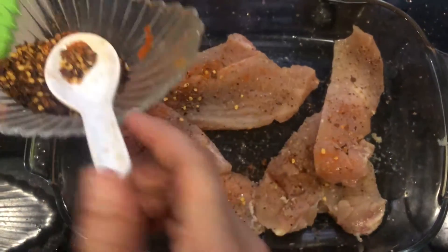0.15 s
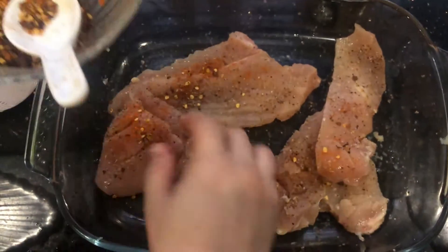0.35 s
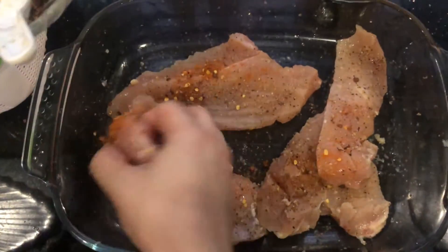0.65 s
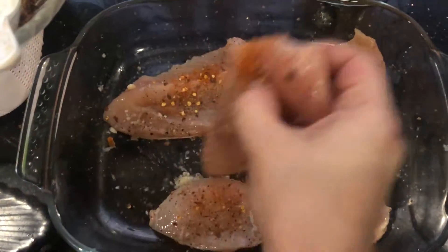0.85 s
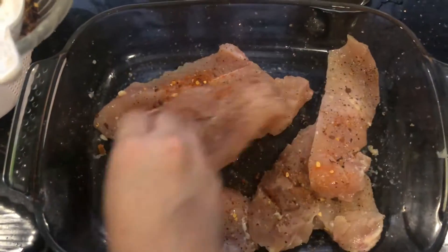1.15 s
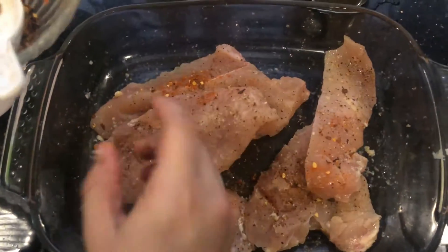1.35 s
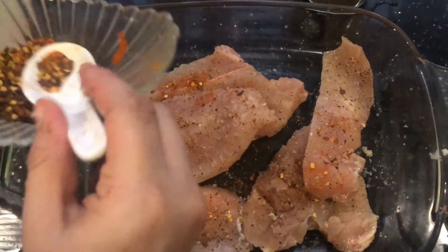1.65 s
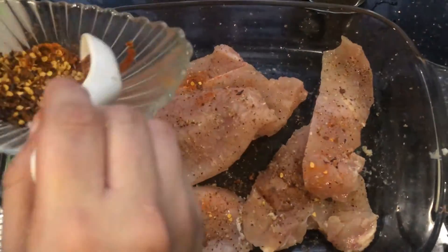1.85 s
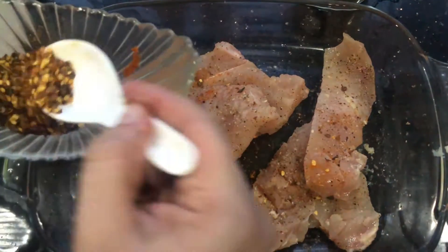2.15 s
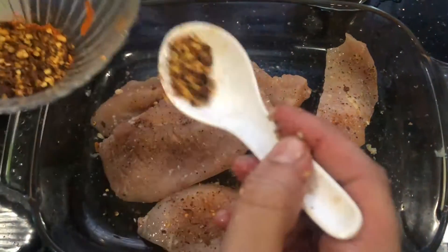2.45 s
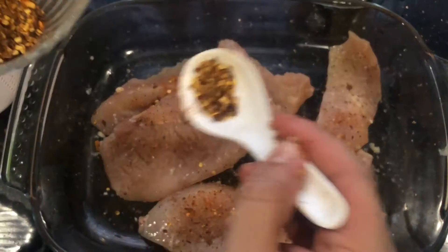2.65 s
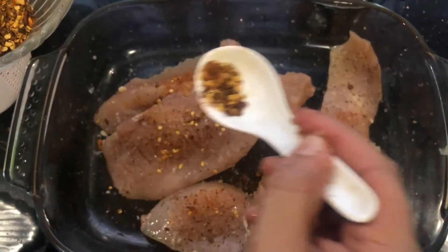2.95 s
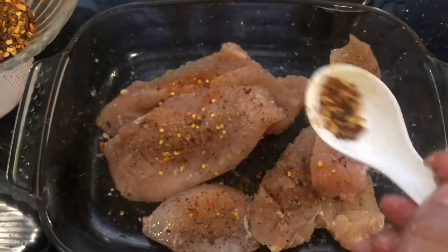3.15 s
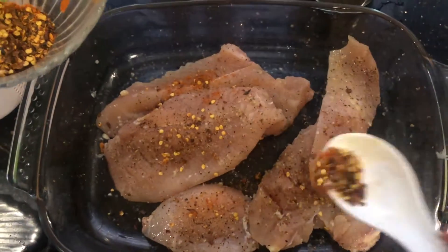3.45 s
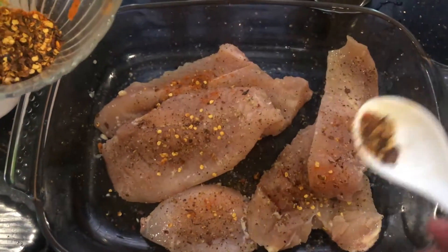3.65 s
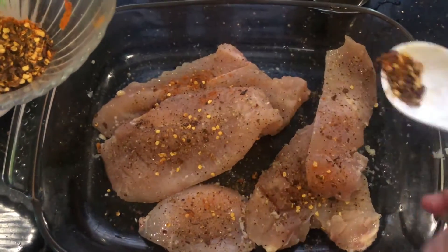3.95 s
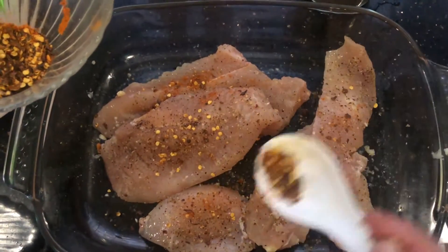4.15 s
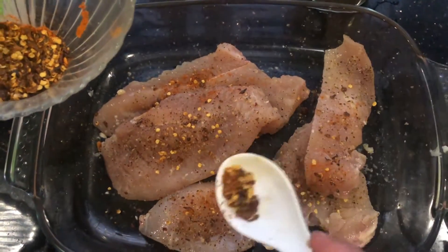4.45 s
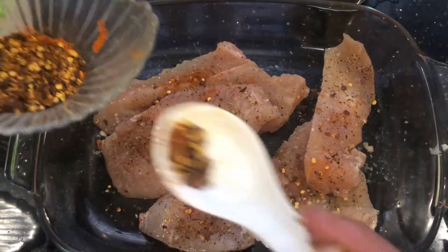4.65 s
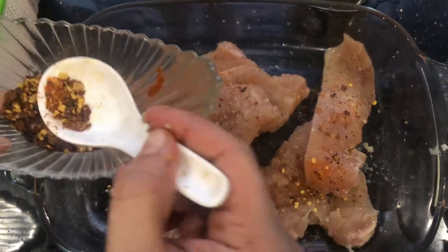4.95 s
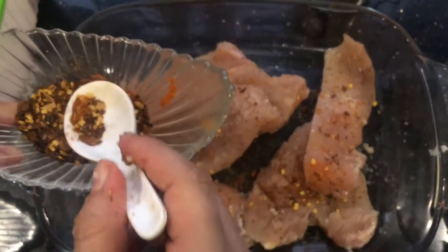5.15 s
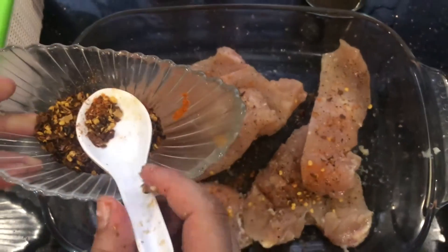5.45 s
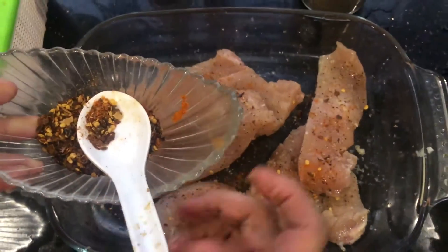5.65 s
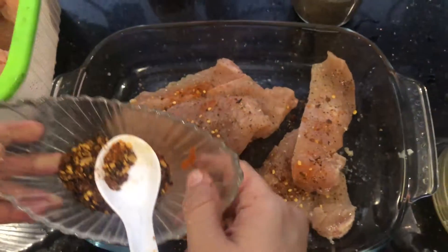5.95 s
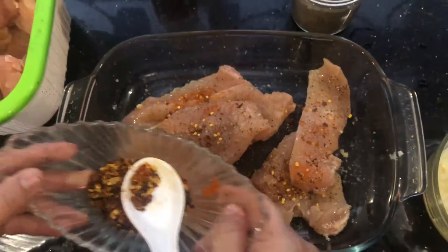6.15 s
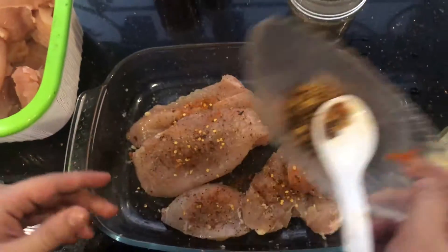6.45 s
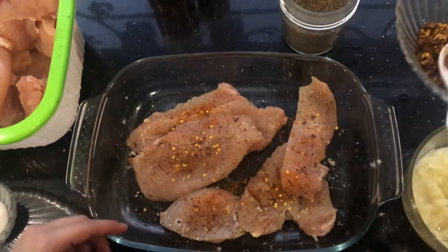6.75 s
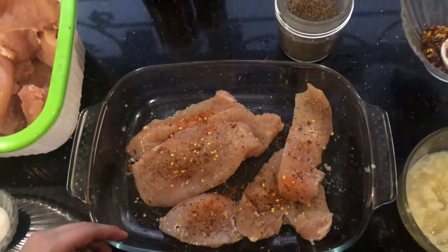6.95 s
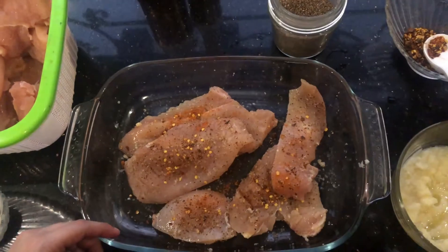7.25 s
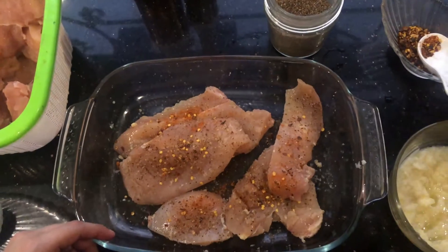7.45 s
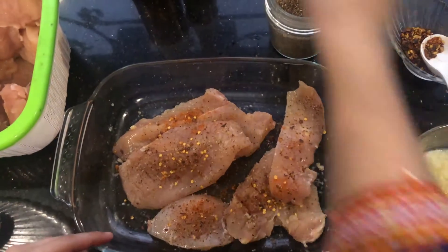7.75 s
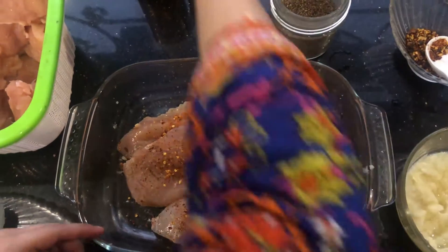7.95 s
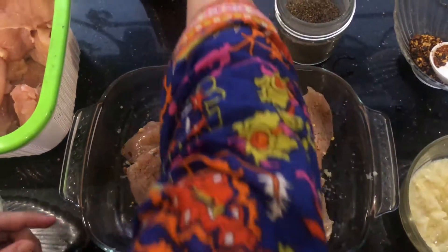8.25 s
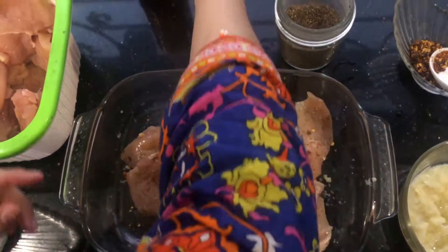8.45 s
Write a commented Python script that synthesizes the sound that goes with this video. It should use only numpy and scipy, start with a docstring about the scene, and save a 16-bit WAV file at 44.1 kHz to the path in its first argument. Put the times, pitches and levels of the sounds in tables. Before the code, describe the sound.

A steady fan whoosh with a low throbbing hum swells slightly after each louder sound and sinks back. Close by, short bright spoon taps on glass come in three groups, with tiny crisp ticks of wet meat. Dishes and cutlery clink across a moderately live kitchen. Late on, a glass bowl lands hard on a stone counter, bounces and quickly flutters still, leaving the fan.

```python
"""In a kitchen, a plastic spoon rattles in a small glass bowl of chilli flakes as raw chicken is turned.
The bowl, a sum of decaying modes, grates over a stone counter, knocks and rocks to rest. Wet meat snaps
and flakes rustle as shaped noise. Dishes clink farther off, as resonances heard through a diffuse room,
over a fan: a coloured rush, faint tones and a slowly beating hum. The recorder's noise suppressor
lets the fan swell with sounds that stand out and sink again after them."""
import sys
import numpy as np
from scipy import signal
from scipy.fft import rfft, irfft, next_fast_len
from scipy.io import wavfile
from scipy.ndimage import map_coordinates

SR = 44100
rng = np.random.default_rng(int(sys.argv[2]) if len(sys.argv) > 2 else 0)


def file_out(sig):
    """Save sig as 16-bit WAV at sys.argv[1]."""
    # one column per channel
    cols = np.atleast_2d(sig).T
    # limit, then scale
    lim = np.clip(cols, -1, 1)
    pcm = np.round(lim * 32767).astype(np.int16)
    wavfile.write(sys.argv[1], SR, pcm)


N = 379348

# Event levels hold ahead of the suppressor; bowl and snap levels also ahead of the room's echo,
# far clinks within it. Mode and spectrum levels are relative.
# modes of the glass bowl: [f/Hz, level/dB, t60/s]
BOWL_MODES = [(1146, -26.5, 0.061), (1568, -23.5, 0.018), (2350, -14.5, 0.069), (2706, 6, 0.043),
              (2790, -7.5, 0.096), (3350, -5, 0.021), (3850, -14.5, 0.033), (4473, -4.5, 0.08),
              (4550, -7, 0.16), (4780, -11, 0.053), (6210, -14, 0.085), (6510, -3.5, 0.034),
              (6890, -19, 0.028), (8130, -19, 0.11), (8730, -17.5, 0.045), (9490, -25.5, .07),
              (10150, -28, 0.046), (10930, -26, 0.08), (11150, -24, 0.061), (11700, -27, .05),
              (14000, -41, 0.072)]
# spoon strikes: [t/s, peak level/dB, brightness/dB per octave, belly mode's extra/dB, rim modes' extra/dB]
SPOON_TAPS = [(0.0862, -7, -2, 0, -2.5), (.098, -24, -3, -5, -4), (0.211, -39, -10, 2, -13),
              (2.044, -45.5, 20, 0, 0), (2.2882, -19, -11, -18, -30), (2.3466, -12, 0.5, 5, -4),
              (2.3535, -12, -9.5, 14, 6.5), (2.381, -21, 14.5, 0, 11), (2.433, -36.5, 14, 0, 0),
              (2.4528, -27, -14.5, -26, -28), (5.277, -12, 0, 6, -4)]
# skids over the ribbed glass: [t/s, length/s, rms level/dB, brightness/dB per octave, rim modes' extra/dB]
SPOON_SKIDS = [(.072, .014, -23, 0, 0.5), (0.129, 0.017, -40, 2, 7), (2.314, 0.025, -36, 0.5, -9),
               (2.389, .007, -28, 7.5, 5), (5.268, .014, -24.5, -2, -6), (5.305, 0.038, -33.5, -4, -7.5),
               (5.369, 0.03, -43, -11.5, -18)]
SKID_SLIPS_PER_S = 2300
RIM_HZ = 2720  # near the bowl's strongest bending mode

# modes of the bowl's foot on the stone: [f/Hz, level/dB, t60/s]
FOOT_MODES = [(430, -31, 0.022), (640, -13.5, 0.014), (830, -15, 0.0084), (970, -16.5, 0.039),
              (1236, -7.5, 0.022), (1423, -10, 0.064), (1650, 1, 0.019), (1890, -1.5, 0.014),
              (2707, -7.5, 0.048), (3600, -16, 0.019), (4490, -20.5, 0.078), (6060, -40, 0.046),
              (9400, -34.5, 0.057), (11750, -41, .04)]
# landing and bounces: [t/s, level/dB, treble/dB per octave]
LANDING_KNOCKS = [(7.2785, -2.5, -1), (7.2999, -7.5, -13), (7.3102, -14, -20), (7.4344, -12, -8),
                  (7.54, -27.5, -21)]
# the foot grates over the stone: (t/s, length/s, level/dB)
FOOT_SLIDE = (7.241, 0.063, -28)
# spectrum of the grating: [f/Hz, density level/dB]
GRATE_SPECTRUM = [(120, -49), (200, -18), (833, -3), (1380, -2), (2290, -4.5), (2700, -2.5), (4010, -13),
                  (4470, -7.5), (5070, -43), (6300, -14.5), (7280, -46), (9720, -37), (15000, -64.5)]
# the rocking: first knock, first mean gap, and shortening of the gap at each knock
ROCK_START_S, ROCK_GAP_S, ROCK_QUICKENS_S = 7.5798, .0346, 0.0013
ROCK_LIMP = 0.1003  # the uneven foot makes the swings short and long in turn, by this share
ROCK_DB, ROCK_LOSS_DB, ROCK_TREBLE_DB = -32, 0.6, -14  # first knock, loss a knock, treble per octave

# wet snaps of the meat: [t/s, level/dB, centre f/Hz]
MEAT_SNAPS = [(.6589, -39, 11700), (0.685, -38, 13800), (0.71, -34.5, 10500), (.7262, -34, 10500),
              (1.1473, -51, 14400), (1.2214, -51, 13000), (1.256, -41, 12500)]
# rustles of handling: [t/s, length/s, level/dB]
FLAKE_RUSTLES = [(.66, 0.048, -66), (1.239, 0.021, -60), (1.924, .11, -68.5)]
# spectrum of the rustling flakes: [f/Hz, density level/dB]
RUSTLE_SPECTRUM = [(3000, -24), (7000, 4), (9500, 4), (12000, -3), (14500, -4.5), (16000, -18.5)]

# resonances of a plate: [f/Hz, width/Hz, level/dB]
PLATE = [(1080, 37, -2.5), (1290, 16, 0.5), (1900, 83, -15.5), (2740, 110, -.5), (3500, 72, -7),
         (3740, 62, -6), (3830, 53, -6), (4770, 86, -3.5), (5530, 16, -7), (5670, 16, -32), (6080, 270, -9),
         (6370, 36, -24), (6800, 100, -13), (7320, 46, -20), (7840, 69, -12), (7630, 25, -15),
         (9560, 75, -22), (11200, 76, -31)]
# resonances of a tumbler: [f/Hz, width/Hz, level/dB]
TUMBLER = [(4100, 44, -1), (5660, 110, 0), (6180, 140, 2), (7200, 310, -21), (8400, 75, -14),
           (10300, 61, -26), (11500, 170, -11), (12300, 110, -19)]
# resonances of a lid: [f/Hz, width/Hz, level/dB]
LID = [(2673, 48, 2), (3180, 140, -7), (4090, 180, -17.5), (4390, 150, -11), (5340, 190, -6.5),
       (5700, 47, -16), (6760, 61, -20), (7300, 91, -9), (8100, 270, -16.5), (8630, 90, -11),
       (10200, 220, -22.5), (10500, 27, -25.5), (11600, 47, -18), (12400, 44, -39), (13300, 150, -40.5),
       (13900, 100, -39.5)]
# resonances of a pot: [f/Hz, width/Hz, level/dB]
POT = [(483, 87, 4), (650, 75, 4), (1154, 26, -4), (2320, 120, -7), (4310, 97, 0.5), (4800, 22, -13),
       (6000, 110, -13), (6290, 77, -13), (6830, 150, -12.5), (8700, 69, -14.5)]
# resonances of a fork: [f/Hz, width/Hz, level/dB]
FORK = [(4060, 150, -7.5), (4440, 69, -6), (5260, 68, -5), (5770, 76, -4), (7060, 65, -13),
        (7300, 110, -10.5), (8350, 38, -41), (9350, 96, -15.5), (10500, 110, -12), (11800, 95, -15),
        (12500, 79, -18), (13600, 150, -22)]
# resonances of mixed cutlery: [f/Hz, width/Hz, level/dB]
CUTLERY = [(1250, 110, -3), (2570, 46, -5), (2900, 120, -1.5), (3350, 90, 1), (3570, 58, -2),
           (4500, 120, -13), (5550, 210, -25.5), (6150, 69, -12), (6740, 89, -11), (7230, 66, -19.5),
           (7200, 100, -12.5), (8070, 150, -10), (9200, 220, -16), (13000, 42, -26)]
# distant clinks: [t/s, ring level/dB, clatter level/dB, clatter centre f/Hz, resonances of what rings]
FAR_CLINKS = [(1.408, -33, -41.5, 3760, PLATE), (1.414, -58, -44, 655, POT),
              (1.596, -48, -58.5, 6240, TUMBLER), (3.375, -23, -34.5, 6660, LID),
              (3.637, -66, -48.5, 2600, PLATE), (3.786, -39.5, -52, 4500, POT),
              (4.05, -58.5, -55, 3000, PLATE), (6.571, -38.5, -51, 6130, FORK),
              (7.051, -33, -35, 5000, CUTLERY)]
# cutlery is dragged over a dish: (t/s, length/s, level/dB)
CUTLERY_DRAG = (6.73, .16, -50.5)
# resonances of the dragged cutlery and dish: [f/Hz, width/Hz, level/dB]
DRAG_RESONANCES = [(4170, 110, -2), (5000, 210, -8), (5400, 42, -1), (5880, 45, -2), (6420, 68, -8),
                   (7210, 190, -14), (10300, 51, -18), (11600, 98, -20)]
# spectrum of the dragging friction: [f/Hz, density level/dB]
DRAG_FRICTION = [(300, -35), (2500, 3.5), (4500, 2), (7000, -4), (12000, -14), (15000, -28)]

# spectrum of the rushing air: [f/Hz, density level/dB]
RUSH_SPECTRUM = [(18, -83), (30, -38), (64, -22), (86, -16), (174, -5), (199, -11), (239, -1.5),
                 (345, -8.5), (394, -9), (437, -10.5), (616, -17), (760, -13.5), (1630, -16.5), (5040, -27),
                 (10000, -45), (16000, -61.5)]
# resonances raised in the rush: [f/Hz, width/Hz, boost/dB]
DUCT_RESONANCES = [(246.7, 61, 5.5), (1122, 56, 4.5), (1645, 180, 4.5)]
# fan tones, about whose levels the loudness wavers: [f/Hz, level/dB]
FAN_TONES = [(119, -62), (146, -61.5), (165, -61), (222, -56.5), (240, -60), (259, -60), (286, -57.5),
             (336, -67), (440, -58), (1021, -59), (1097, -60.5), (1586, -61)]
# reverberation time of the kitchen: [f/Hz, t60/s]
ROOM_DECAY = [(200, 0.71), (1500, 0.43), (4000, 0.34), (8000, 0.34), (15000, 0.18)]
TOP_HZ = 15850  # band limit of the recorder


def spoon():
    """Modal impact and stick-slip: the loose spoon strikes the glass and skids in runs of tiny slips."""
    out = np.zeros(N)
    for s, db, bright, belly_db, rim_db in SPOON_TAPS:
        tap = strike(BOWL_MODES, bowl_colour(bright, belly_db, rim_db), crack_db=-17.5, crack_t60=0.081,
                     scatter_db=1.0, detune=0.0057, contact=0.00038)
        add(out, s, amp(db) * in_room(tap, wet_db=-12.0))
    t = np.arange(SR // 10) / SR
    for s, length, db, bright, rim_db in SPOON_SKIDS:
        slip = strike(BOWL_MODES, bowl_colour(bright, 0, rim_db), crack_db=-19, crack_t60=0.06,
                      scatter_db=0.0, detune=0.0059, contact=0.00071)
        slip_times = rng.random(len(t)) < SKID_SLIPS_PER_S / SR
        envelope = (t < length) * (t / length) ** 0.17
        skid = signal.fftconvolve(slip_times * rng.standard_normal(len(t)) * envelope, slip)
        loudness = np.std(skid[:len(t)][t < length + .005]) + 1e-12
        add(out, s, amp(db) * in_room(skid / loudness, wet_db=-13.5))
    return out


def bowl_colour(bright_db, belly_db, rim_db, rim_width_hz=450):
    """Modal excitation: where and how softly the spoon lands sets a level in dB for each bowl mode."""
    hz = np.transpose(BOWL_MODES)[0]
    tilt = bright_db * np.log2(hz / hz[0])
    belly = belly_db * (hz == hz[0])
    rim = rim_db * (np.abs(hz - RIM_HZ) < rim_width_hz)
    return tilt + belly + rim


def set_down(knee_hz=1800):
    """Friction, then impact: the bowl grates on stone and knocks, its treble tilted above the knee."""
    grating = stroke(*FOOT_SLIDE, attack=0.061, release=0.05) * grains(GRATE_SPECTRUM, rate=8000)
    out = in_room(grating, wet_db=-8.5)[:N]
    octaves = np.maximum(np.log2(np.transpose(FOOT_MODES)[0] / knee_hz), 0)
    for s, db, treble in LANDING_KNOCKS + rocking():
        knock = strike(FOOT_MODES, treble * octaves, crack_db=-26, crack_t60=0.018,
                       scatter_db=1.0, detune=0.0203, contact=.00025)
        add(out, s, amp(db) * in_room(knock, wet_db=-9.5))
    return out


def rocking(count=14):
    """Dissipative rocking: ever weaker knocks, closer on average, as (t/s, level/dB, treble/dB per octave)."""
    k = np.arange(count)
    gaps = (ROCK_GAP_S - ROCK_QUICKENS_S * k) * (1 - ROCK_LIMP * (-1) ** k)
    times = ROCK_START_S + np.cumsum(gaps) - gaps
    return [(s, db, ROCK_TREBLE_DB) for s, db in zip(times, ROCK_DB - ROCK_LOSS_DB * k)]


def handling(snap_t60=0.0082, snap_width_hz=1900):
    """Filtered noise: wet meat snaps in brief decaying bands and the spice flakes rustle as grains."""
    movement = sum(stroke(*row, attack=0.097, release=0.083) for row in FLAKE_RUSTLES)
    out = movement * grains(RUSTLE_SPECTRUM, rate=4000)
    t = np.arange(SR // 20) / SR
    for s, db, hz in MEAT_SNAPS:
        band = lambda f: np.exp(-((f - hz) / snap_width_hz) ** 2)
        film = unit(filtered(rng.standard_normal(len(t)), band))
        add(out, s, amp(db) * in_room(film * amp(-60 * t / snap_t60), wet_db=-17))
    return out


def far_dishes(clatter_octaves=0.92, low_cut_hz=300):
    """Diffuse-field transmission: far clinks arrive as soft-edged reverberation; a scrape swells and fades."""
    ringing = unit(filtered(grains(DRAG_FRICTION, rate=7700), lambda f: resonances(DRAG_RESONANCES, f)))
    friction = ringing + amp(-4) * grains(DRAG_FRICTION, rate=7600)
    pressure = amp(3.2 * wobble(35))  # the pressure wavers
    out = stroke(*CUTLERY_DRAG, attack=0.1, release=.3) * unit(friction * pressure)
    low_cut = lambda f: f ** 2 / (f ** 2 + low_cut_hz ** 2)
    for s, ring_db, clatter_db, centre_hz, dish in FAR_CLINKS:
        body = lambda f: resonances(dish, f)
        band = lambda f: np.exp(-(np.log2((f + 1) / centre_hz) / clatter_octaves) ** 2)
        for db, response in ((ring_db, body), (clatter_db, band)):
            sound = filtered(room_tail(build=0.0062), lambda f: response(f) * low_cut(f))
            add(out, s, amp(db) * sound / np.std(sound[:SR // 20]))  # level over the first 50 ms
    return out


def resonances(dish, f):
    """Superposed resonance: second-order band-passes of alternating sign, from f, width and level."""
    return sum((-1) ** k * amp(db) * 1j * f * width / (centre ** 2 - f ** 2 + 1j * f * width)
               for k, (centre, width, db) in enumerate(dish))


def fan(rush_db=-44.0, hum_db=-54, mains_share=0.6):
    """Resonant flow noise and beats: air rushes steadily; the motor's hum beats against the mains hum."""
    t = np.arange(N) / SR
    mains_hz, beat_hz, null_s = 100, 2.32, .15  # the hums oppose each other at null_s
    duct_db = lambda f: sum(db / (1 + (2 * (f - hz) / width) ** 2) for hz, width, db in DUCT_RESONANCES)
    rush = unit(filtered(rng.standard_normal(N), lambda f: amp(along(RUSH_SPECTRUM, f) + duct_db(f))))
    motor = np.sin(2 * np.pi * (mains_hz - beat_hz) * (t - null_s))
    mains = np.sin(2 * np.pi * mains_hz * (t - null_s))
    whine = sum(amp(db + 2.7 * wobble(9.3)) * np.sin(2 * np.pi * hz * t + 0.7 * wobble(7))
                for hz, db in FAN_TONES)
    return amp(rush_db) * rush + amp(hum_db) * (motor - mains_share * mains) + whine


def strike(modes, colour_db, crack_db, crack_t60, scatter_db, detune, contact):
    """Modal synthesis: decaying sines summed to peak 1, plus a noise crack, under an onset of contact s."""
    hz, db, t60 = np.transpose(modes)[:, :, None]
    t = np.arange(SR // 3) / SR
    level = db + colour_db[:, None] + scatter_db * rng.standard_normal(hz.shape)
    sign = (-1) ** np.arange(len(hz))[:, None]  # neighbouring modes radiate in opposite phase
    loaded = hz * (1 + detune * rng.standard_normal(hz.shape))  # whatever touches the glass pulls its pitch
    ring = np.sum(sign * amp(level - 60 * t / t60) * np.sin(2 * np.pi * loaded * t), axis=0)
    colour = lambda f: amp(along(np.hstack([hz, level]), f)) * np.minimum(f / hz[0], 1) ** 2
    crack = unit(filtered(rng.standard_normal(len(t)), colour)) * amp(crack_db - 60 * t / crack_t60)
    onset = 1 - np.exp(-(t / contact) ** 2)
    return (ring / np.abs(ring).max() + crack) * onset


def grains(spectrum, rate):
    """Stick-slip friction: tiny slips of uneven size, about rate a second, coloured and set to rms 1."""
    slips = (rng.random(N) < rate / SR) * rng.standard_normal(N)
    return unit(filtered(slips, lambda hz: amp(along(spectrum, hz))))


def stroke(s, length, db, attack, release):
    """Exponential envelope: gain rises 60 dB in attack s up to s, holds, and falls 60 dB in release s."""
    t = np.arange(N) / SR
    rise = 60 * np.maximum((s - t) / attack, 0)
    fall = 60 * np.maximum((t - s - length) / release, 0)
    return amp(db - rise - fall)


def in_room(sound, wet_db, near_t60=0.83):
    """Direct and reverberant field: extra decay gives the early echoes off the counter the most weight."""
    tail = room_tail(build=0.0037)
    near_tail = tail * amp(-60 * np.arange(len(tail)) / SR / near_t60)
    out = amp(wet_db) * signal.fftconvolve(sound, near_tail)
    return out + np.pad(sound, (0, len(out) - len(sound)))


def room_tail(build):
    """Diffuse decay: fresh noise with time constant build/s at its onset, dying by band, at energy 1."""
    hz, t, z = signal.stft(rng.standard_normal(SR // 2), SR, nperseg=256)
    decay = amp(-60 * t / along(ROOM_DECAY, hz)[:, None])
    tail = signal.istft(z * decay, SR, nperseg=256)[1]
    tail = tail * (1 - np.exp(-np.arange(len(tail)) / SR / build))
    return tail / np.linalg.norm(tail)


def amp(db):
    """Logarithmic level: decibels to amplitude gain."""
    return 10 ** (np.asarray(db) / 20)


def unit(x):
    """Root-mean-square normalisation: x at rms 1."""
    return x / np.sqrt(np.mean(x ** 2) + 1e-20)


def along(points, hz):
    """Interpolation over log frequency: the curve through (f/Hz, value) points."""
    f, value = np.transpose(points)
    return np.interp(np.log(hz + 1), np.log(f + 1), value)


def wobble(rate):
    """Band-limited fluctuation: a smooth random curve with rate knots a second."""
    knots = rng.standard_normal(int(N * rate / SR) + 4)
    return map_coordinates(knots, [np.arange(N) * rate / SR])


def filtered(x, response):
    """Linear filtering: the spectrum of x times a response of frequency."""
    m = next_fast_len(len(x) + SR // 4)
    return irfft(rfft(x, m) * response(np.fft.rfftfreq(m, 1 / SR)), m)[:len(x)]


def add(track, s, sound):
    """Superposition: mix a sound into the track at s seconds."""
    part = track[round(s * SR):][:len(sound)]
    part += sound[:len(part)]


def suppressor(x, depth_db=7.5, threshold_db=3.5, knee_db=5, attack_s=0.058, release_s=0.61, size=512):
    """Downward expansion: gain opens fast for sound above the steady noise, then slowly sinks again."""
    hz, times, z = signal.stft(x, SR, nperseg=size)
    power = np.abs(z[hz < TOP_HZ]) ** 2
    steady = np.median(power, axis=1, keepdims=True)
    excess_db = 10 * np.log10(np.mean(power / steady, axis=0) + 1e-12)
    step, opened = times[1], [0]
    for heard in np.clip((excess_db[1:] - threshold_db) / knee_db, 0, 1):
        change = heard * (1 - opened[-1]) * step / attack_s - (1 - heard) * step / release_s
        opened.append(min(max(opened[-1] + change, 0), 1))
    return x * amp(depth_db * (np.interp(np.arange(N) / SR, times, opened) - 1))


def scene():
    """Superposition: all sources summed at one microphone."""
    return (spoon() + set_down() + handling() + far_dishes() + fan())[None]


def record(dry, bass_hz=62, treble_hz=14600):
    """Expansion and band limiting: steady noise, deep bass and top treble sink; nothing passes TOP_HZ."""
    bass_cut = lambda hz: hz ** 2 / np.sqrt(hz ** 4 + bass_hz ** 4)
    treble_cut = lambda hz: 1 / np.sqrt(1 + (hz / treble_hz) ** 16)
    return filtered(suppressor(dry[0]), lambda hz: bass_cut(hz) * treble_cut(hz) * (hz < TOP_HZ))[None]


dry = scene()
out = record(dry)
file_out(out)
```